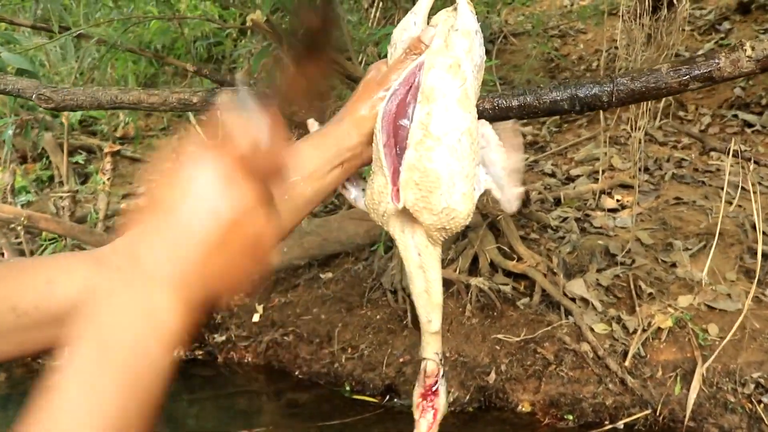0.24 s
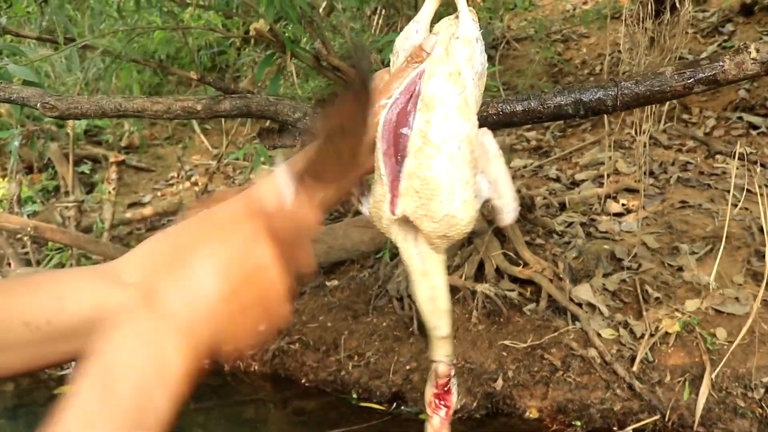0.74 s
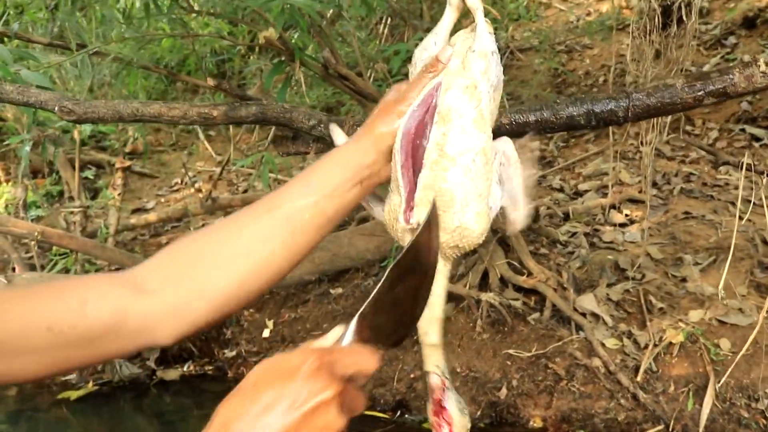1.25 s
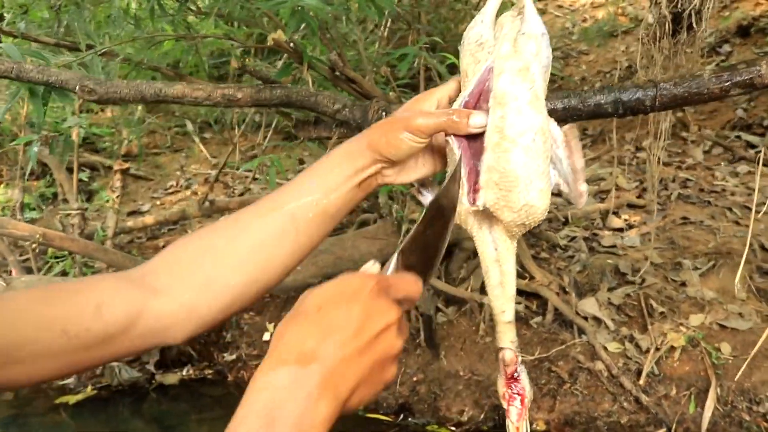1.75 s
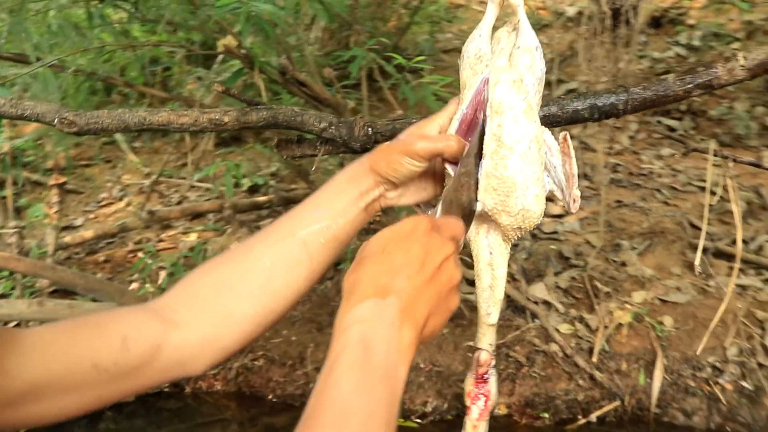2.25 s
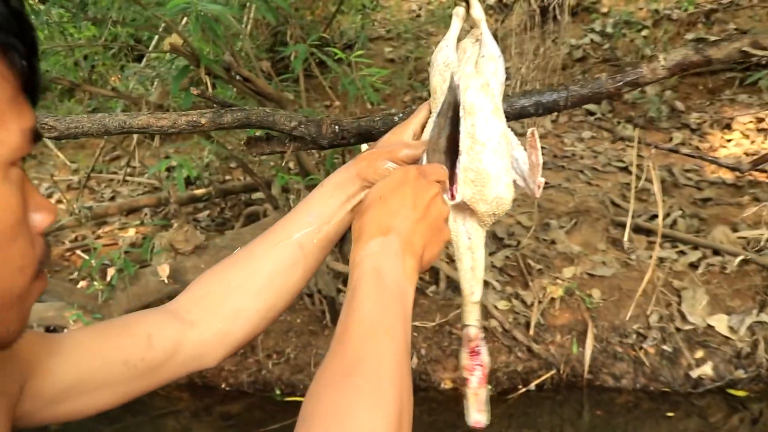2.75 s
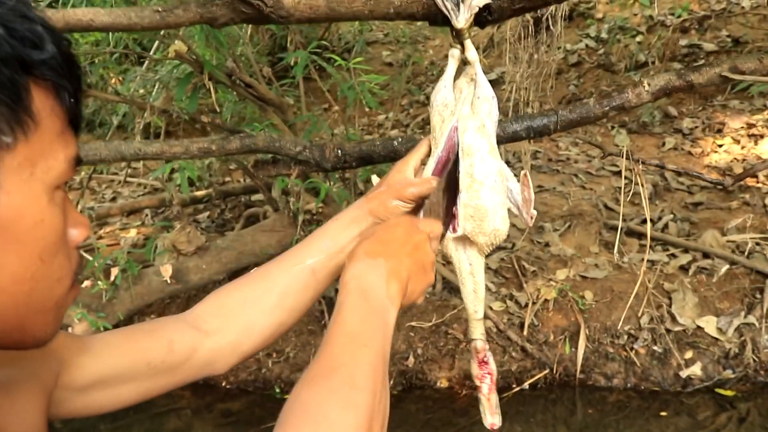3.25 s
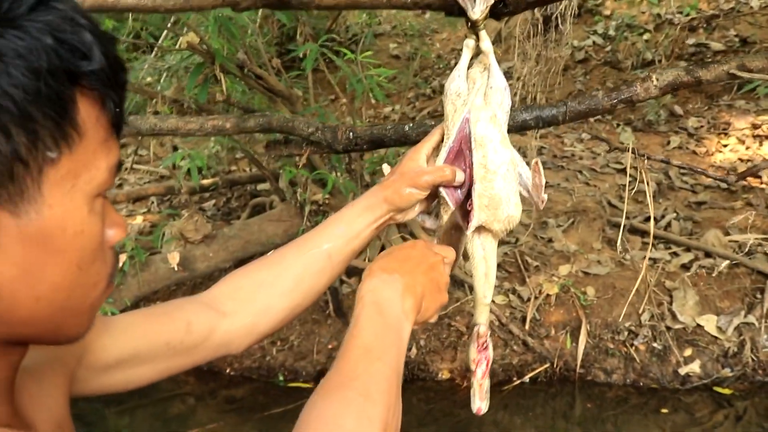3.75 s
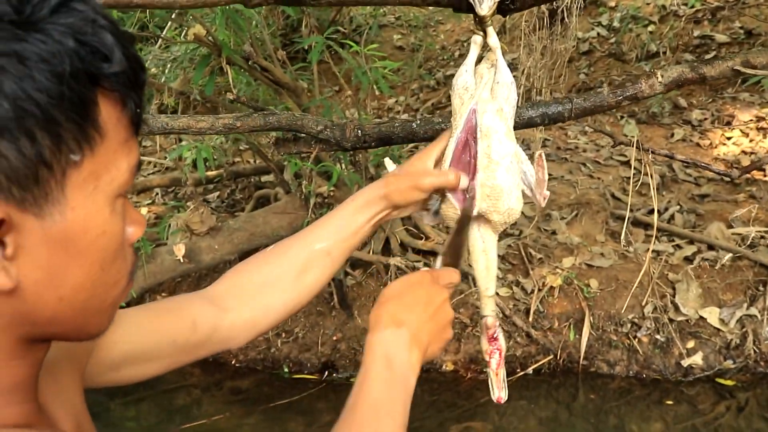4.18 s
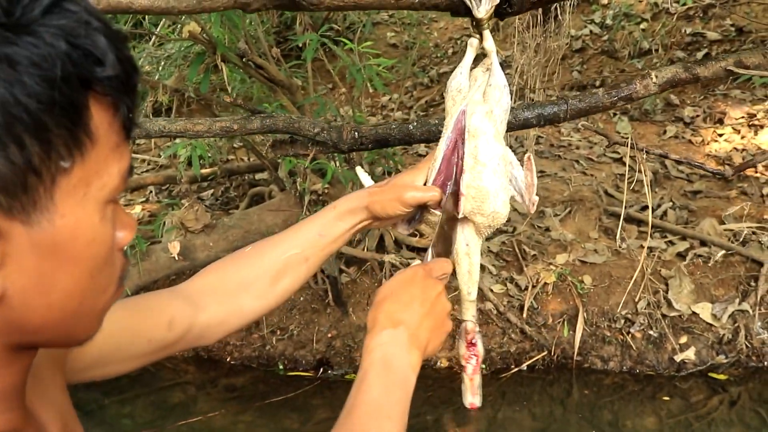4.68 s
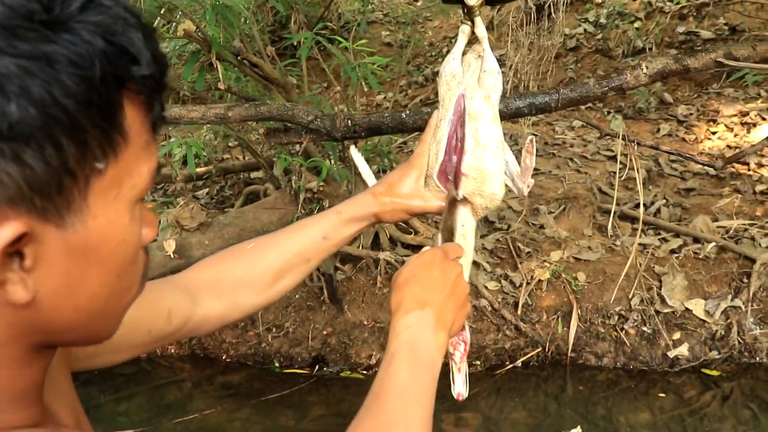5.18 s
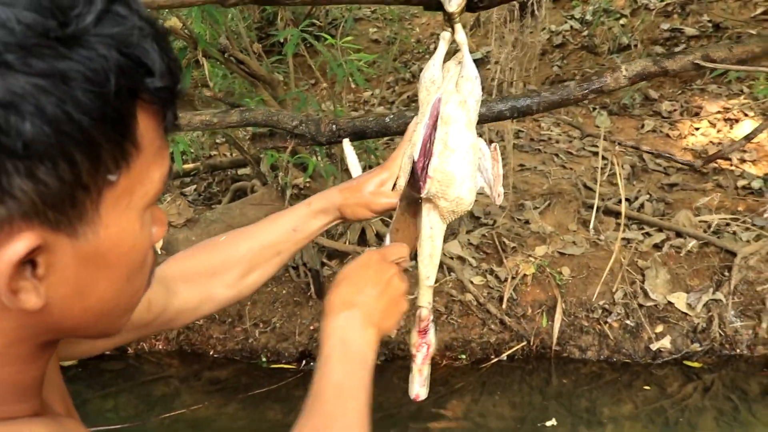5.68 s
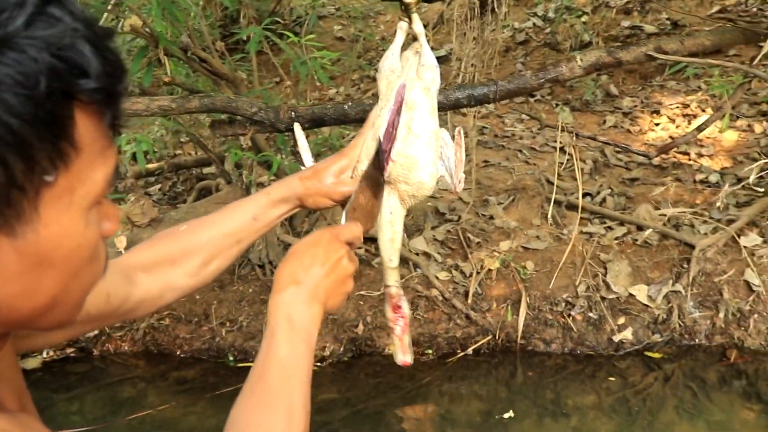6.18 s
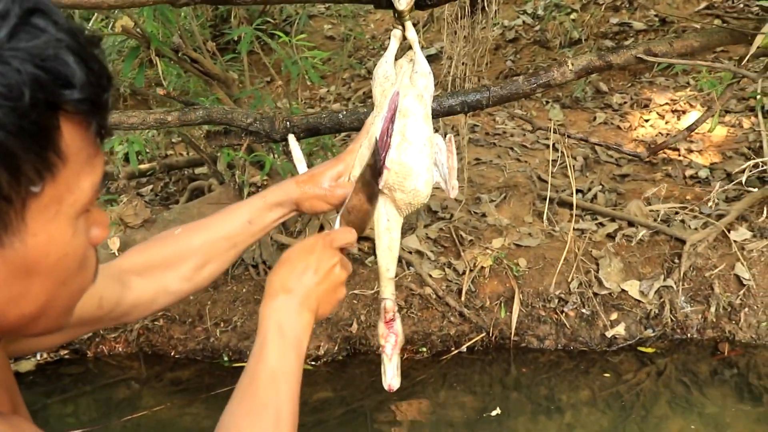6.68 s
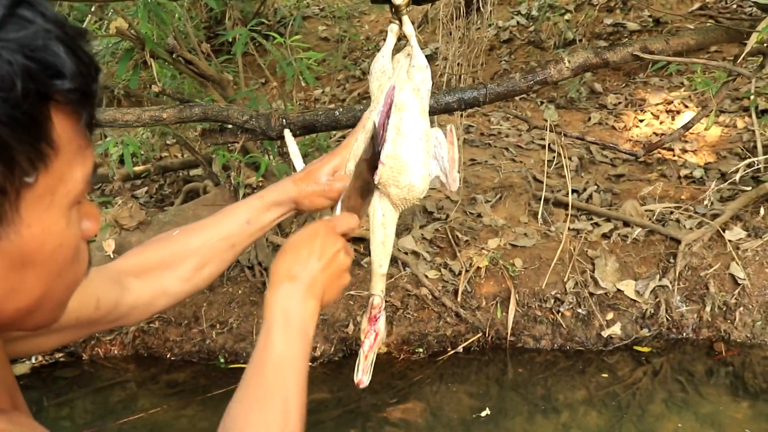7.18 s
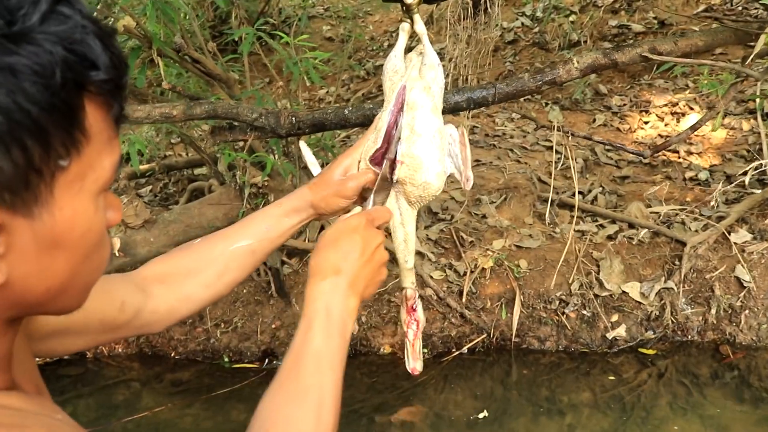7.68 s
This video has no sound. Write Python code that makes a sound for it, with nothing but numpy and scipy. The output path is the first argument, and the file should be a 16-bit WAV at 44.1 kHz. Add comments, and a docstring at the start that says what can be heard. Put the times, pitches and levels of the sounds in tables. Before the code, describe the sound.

A close stereo microphone catches three heavy wet smacks of a blade on a bird carcass within the first second or so. The knife then cuts softly, with tiny ticks and faint steel singing, while drops plip into water. Near the end come about ten fast, gritty scraping strokes with metallic rasp and sharp snaps. All around are a gentle stream, shrill pulsing insects, treble hiss and a faint low throb.

```python
"""Jungle stream, with a plucked bird hanging over it. Filtered noise makes the flickering water, the pulsing
insect trills and a treble hiss; a soft low beat throbs underneath. The flat of a big knife slaps the bird three
times (noise puffs, ringing modes), the edge slices quietly with small snaps, then scrapes feather stubs in quick
strokes (dense clicks drive blade and carcass), and a last cut follows. A few drops plop as gliding bubbles.
A limiter ducks briefly after hard blows."""
import sys
import numpy as np
from scipy import signal
from scipy.fft import rfft, irfft, next_fast_len
from scipy.io import wavfile

SR = 44100
rng = np.random.default_rng(int(sys.argv[2]) if len(sys.argv) > 2 else 0)


def wav_record(signal):
    """Record a signal, one row per channel, as 16-bit PCM in the file named by sys.argv[1]."""
    frames = np.transpose(np.atleast_2d(signal))
    bounded = np.clip(frames, -1, 1)
    # unit amplitude maps onto the largest positive 16-bit level
    quanta = np.round(bounded * 32767).astype(np.int16)
    wavfile.write(sys.argv[1], SR, quanta)


N = 349697
T = np.arange(N) / SR

# modes of the free knife blade: (frequency [Hz], t60 [s], struck flat [dB], rubbed on the edge [dB])
BLADE_MODES = [(2590, 0.057, -10, -39), (2694, 0.043, -28, 4), (2833, 0.038, -36, -1.5),
               (3120, 0.035, 3.5, -7.5), (3160, 0.3, -38, -28), (3360, 0.019, -20, -3.5),
               (3650, 0.022, -23, -7.5), (3940, 0.018, 1, -8), (4240, 0.044, -6, -34),
               (4280, 1.43, -49, -44), (5160, 0.018, 4.5, -46), (6000, 0.06, -23, -23),
               (9140, 0.043, -1, -11), (9890, 0.027, 4.5, -4.5), (9760, 0.23, -25, -9)]


def undb(db):
    """Turn decibels into an amplitude factor."""
    return 10 ** (np.asarray(db) / 20)


def unit(x):
    """Scale to rms 1."""
    return x / np.sqrt(np.mean(x ** 2) + 1e-18)


def fade(t, t60):
    """Exponential decay, 60 dB down at t60."""
    return np.exp(-np.log(1000) * t / t60)


def add(out, s, x):
    """Mix x into out from time s."""
    i = int(s * SR)
    out[..., i:i + x.shape[-1]] += x[..., :N - i]


def lookup(points, hz):
    """Read a curve on a log-frequency axis."""
    f, value = np.transpose(points)
    return np.interp(np.log(hz + 1), np.log(f), value)


def colour(x, points):
    """Filter x by a curve of (frequency [Hz], gain [dB]) points."""
    n = next_fast_len(x.shape[-1])
    gain = undb(lookup(points, np.fft.rfftfreq(n, 1 / SR)))
    return irfft(rfft(x, n) * gain, n)[..., :x.shape[-1]]


def band(x, hz, width):
    """One resonance, gain 1 at its centre."""
    return signal.lfilter(*signal.iirpeak(hz, hz / width, fs=SR), x)


def narrow(hz, width):
    """Band of noise through two equal resonances, unrelated in the two ears."""
    noise = rng.standard_normal((2, N))
    once = band(noise, hz, 1.57 * width)
    return unit(band(once, hz, 1.57 * width))


def walk(rate):
    """Random drift with a spread near 1, joining `rate` random points per second by straight lines."""
    count = int(8 * rate) + 2
    return 1.385 * np.interp(T * rate, np.arange(count), rng.standard_normal(count))


def swell(s, rise_s, fall_s, power):
    """Rise to 1 at time s and fall away again."""
    return np.interp(T, [s - rise_s, s, s + fall_s], [0, 1, 0]) ** power


def ring(t, modes):
    """Sum of struck modes: (frequency [Hz], t60 [s], level [dB])."""
    return sum(undb(db) * fade(t, t60) * np.sin(2 * np.pi * hz * t) for hz, t60, db in modes)


def burst(hz, width, t60):
    """A short puff of noise around one frequency."""
    t = T[:SR // 4]
    return unit(band(rng.standard_normal(len(t)), hz, width)) * fade(t, t60)


def slips(rate, spread_db):
    """Dense clicks of uneven size and random sign, as an edge sticks and slips."""
    hit = rng.random(N) < rate / SR
    size = undb(spread_db * np.minimum(rng.exponential(size=N), 4))
    return hit * rng.choice([-1, 1], N) * size


def rubbed(x, response):
    """A body driven by a stream of tiny slips."""
    return unit(signal.fftconvolve(x, response)[:len(x)])


def thud(t, hz):
    """The carcass wobbles for a few cycles; it is too small to radiate deep bass."""
    # modes of the carcass: (multiple of the thud pitch, t60 [s], relative level [dB])
    flesh_modes = [(1, 0.052, -10.5), (1.25, 0.039, -3.5), (1.9, 0.019, -9)]
    wobble = ring(t, [(hz * multiple, t60, db) for multiple, t60, db in flesh_modes])
    highpass = signal.butter(3, 0.63 * hz, "high", fs=SR, output="sos")
    return signal.sosfilt(highpass, wobble) / 2


def pressed_blade(t, pitch_hz, longest_t60):
    """The blade with its edge in the skin, which damps its modes and shifts them with the point of contact."""
    shift = pitch_hz / BLADE_MODES[1][0]  # the second mode lands on pitch_hz
    return ring(t, [(hz * shift, min(t60, longest_t60), db) for hz, t60, _, db in BLADE_MODES])


def bubble(hz, t60, rise_oct_per_s):
    """A trapped bubble rings and climbs in pitch as it nears the surface."""
    t = T[:SR // 6]
    pitch = hz * 2 ** (rise_oct_per_s * t)
    return fade(t, t60) * np.sin(2 * np.pi * np.cumsum(pitch) / SR)


def stream(water_db=-50, flicker_db=1.5, gurgle_rest_db=-65, gurgle_rise=0.39, bubble_db=-60, count=170):
    """Running water: flickering noise bands, alike in both ears in the bass, a hollow gurgle and small bubbles."""
    # spectrum of the wash: (frequency [Hz], relative density [dB per Hz])
    water_spectrum = [(25, -8), (45, -8.5), (80, -5), (140, -7), (220, -13), (380, -10.5), (600, -15),
                      (850, -15.5), (1400, -12.5), (2200, -17), (4000, -19), (6200, -42.5)]
    # likeness of the two ears: (frequency [Hz], correlation)
    ear_likeness = [(60, 0.81), (300, 0.54), (640, 0.48), (1400, 0.014), (3000, 0)]
    # the stream gurgles up: (time of the peak [s], length [s], level [dB])
    gurgle_swells = [(2.05, 0.76, -62), (4.018, .65, -55), (6.2, 0.6, -59)]
    wash = 0
    for hz in 35 * 2 ** (np.arange(16) / 2):  # half-octave bands
        like = lookup(ear_likeness, hz)
        mid, side = narrow(hz, hz / 3)
        pair = np.sqrt(1 + like) * mid + np.sqrt(1 - like) * side * np.array([[1], [-1]])
        wash = wash + pair * np.sqrt(hz) * undb(lookup(water_spectrum, hz) + flicker_db * walk(14))

    hollow = narrow(341, 106)
    hollow = unit(hollow + hollow.mean(axis=0))  # drawn towards the middle
    gurgle = undb(gurgle_rest_db)
    for s, length, db in gurgle_swells:
        # gurgle_rise is the share of a swell in which it builds
        gurgle = gurgle + undb(db) * swell(s, gurgle_rise * length, (1 - gurgle_rise) * length, 0.78)

    out = unit(wash) * undb(water_db) + hollow * gurgle
    for when, size, loud, side in rng.random((count, 4)):
        pan = np.sqrt([[side], [1 - side]])
        level = undb(bubble_db + 14 * loud ** 2)
        add(out, when * N / SR, pan * level * bubble(450 * 6 ** size, 0.021, 4.6))
    return out


def insects(waver_db=0.7):
    """Wingbeats pulse bands of noise into a chorus of trills; crickets chirp in narrow bands among them."""
    # chorus: (centre [Hz], width [Hz], level [dB], mean pulse rate [per s], pulse depth [0-1])
    chorus_bands = [(6786, 67, -56.5, 66, 0.25), (7150, 240, -54.5, 84, 0.17), (7463, 120, -54.5, 35, 0),
                    (7506, 140, -53, 120, 0.45), (7450, 570, -53, 260, 0.3)]
    # chirping crickets: (centre [Hz], level [dB], mean chirp rate [per s])
    cricket_bands = [(8050, -61.5, 5.1), (8260, -72, 6.5), (7260, -66, 7.3)]
    out = 0
    for hz, width, db, rate, depth in chorus_bands:
        wings = np.cumsum(rate * (1 + 0.0205 * walk(4))) / SR  # cycles, at a wavering rate
        pulses = unit(1 + depth * np.cos(2 * np.pi * wings))
        out = out + narrow(hz, width) * pulses * undb(db + waver_db * walk(5.4))
    for hz, db, rate in cricket_bands:
        chirps = np.cumsum(rate * (1 + 0.13 * walk(2.88))) / SR
        pulses = unit(np.sin(np.pi * chirps) ** 4 + 0.071)
        out = out + narrow(hz, 70) * pulses * undb(db)
    return out


def treble_hiss():
    """Treble noise, unrelated in the two ears, whose level slowly drifts."""
    # spectrum: (frequency [Hz], relative density [dB per Hz])
    hiss_spectrum = [(4000, -3.5), (6000, -2.5), (8500, -0.5), (10500, -1), (13000, -5), (16000, -6)]
    # loudness over time: (time [s], level [dB])
    hiss_level = [(0, -48), (1.6, -49), (2.0, -54), (2.45, -53.5), (2.7, -56.5), (3.4, -50.5), (4.1, -56.5),
                  (5.6, -56), (7.93, -49.5)]
    noise = unit(colour(rng.standard_normal((2, N)), hiss_spectrum))
    return noise * undb(np.interp(T, *np.transpose(hiss_level)))


def slaps(crack_t60=0.021, smack_t60=0.018, spray_db=-40, spray_t60=0.45,
          turn_rate_hz=5.0, turn_depth=0.29, lift_s=0.022):
    """The flat of the blade squeezes air and water off the skin; flesh thuds, steel clangs and one mode rings on."""
    # slaps: (time [s], thud [dB], thud pitch [Hz], smack [dB], smack centre [Hz], smack width [Hz],
    # wet crack [dB], crack centre [Hz], crack width [Hz] (both ahead of a broad filter),
    # clang [dB], long ring [dB], time until the hand damps it [s])
    blade_slaps = [(0.017, -2, 241, -9, 1120, 2570, -15, 9300, 7900, -31, -47, 0.0044),
                   (0.5523, -7, 236, -4, 1210, 2500, 8, 8200, 10300, -3.5, -41, 0.58),
                   (1.1182, -13.5, 222, -13.5, 470, 71, -6, 6400, 2270, -32, -42.5, 0.1)]
    out, t = np.zeros(N), T[:SR]
    clang = ring(t, [(hz, t60, db) for hz, t60, db, _ in BLADE_MODES])
    free_hz, free_t60, *_ = max(BLADE_MODES, key=lambda mode: mode[1])
    # the ring opens as the blade lifts off the skin, then swells and sinks as the swinging blade turns its face
    lift = 1 - np.exp(-t / lift_s)
    turn = 1 - turn_depth * np.cos(2 * np.pi * turn_rate_hz * t)
    sing = ring(t, [(free_hz, free_t60, 0)]) * lift * turn
    for (s, thud_db, thud_hz, smack_db, smack_hz, smack_width,
         crack_db, crack_hz, crack_width, clang_db, ring_db, free_s) in blade_slaps:
        damping = 1 / (1 + (t / free_s) ** 5)
        steel = (undb(clang_db) * clang + undb(ring_db) * sing) * damping
        smack = band(burst(smack_hz, smack_width, smack_t60), smack_hz, 2 * smack_hz + smack_width)
        crack = band(burst(crack_hz, crack_width, crack_t60), 7400, 14700)
        add(out, s, undb(thud_db) * thud(t, thud_hz) + steel)
        add(out, s, undb(smack_db) * smack)
        add(out, s, undb(crack_db) * crack)
        add(out, s, undb(crack_db + spray_db) * burst(7000, 5000, spray_t60))
    return out


def throb(db=-43, range_db=15, rate_hz=8.58):
    """A soft low beat: a short decaying bass tone, repeated evenly at uneven strength."""
    out, beat = np.zeros(N), ring(T[:SR // 5], [(58.7, 0.18, 0.0044)])
    for s in np.arange(.072, N / SR, 1 / rate_hz):
        add(out, s, undb(db - range_db * rng.random()) * beat)
    return out


def snaps(snap_t60=0.011, spread=0.5, flesh_hz=260, flesh_db=8,
          tick_from_s=4.4, tick_to_s=6.2, tick_db=-39.5, tick_range_db=8, tick_hz=9700, count=8):
    """A stub or sinew lets go of the edge and jolts blade and carcass; fine fibres only tick, at random."""
    # the edge catches and snaps: (time [s], snap [dB], snap centre [Hz], tug on blade and carcass [dB])
    edge_snaps = [(1.367, -33, 11200, -53), (1.635, -37, 9000, -51), (2.317, -40, 3000, -50),
                  (3.055, -36, 5700, -53), (5.7438, -32.5, 11200, -50), (5.948, -26.5, 9700, -37),
                  (6.197, -28, 3760, -41), (6.4485, -31, 7400, -33), (6.557, -29, 3960, -36.5),
                  (6.6814, -21.5, 9100, -34), (6.7116, -26.5, 9000, -34), (6.9474, -34, 9000, -36),
                  (7.0407, -42, 9000, -41.5), (7.1632, -28, 10150, -48), (7.2137, -27, 9000, -32.5),
                  (7.4477, -30, 8000, -36), (7.48, -26.5, 7800, -39)]
    out, t = np.zeros(N), T[:SR // 4]
    # flesh_db sets the carcass relative to the blade's tug
    jolt = pressed_blade(t, pitch_hz=2854, longest_t60=0.02) + undb(flesh_db) * thud(t, flesh_hz)

    def tick(hz):
        """Parting fibre: a tiny puff of noise."""
        return band(burst(hz, spread * hz, snap_t60), hz, 2 * spread * hz)

    for s, db, hz, tug_db in edge_snaps:
        add(out, s, undb(db) * tick(hz) + undb(tug_db) * jolt)
    for when, weak in rng.random((count, 2)):
        s = tick_from_s + when * (tick_to_s - tick_from_s)
        add(out, s, undb(tick_db - tick_range_db * weak) * tick(tick_hz))
    return out


def drops(rise_oct_per_s=3.3, splash_hz=3940, splash_t60=0.014, droplet_t60=0.024, count=6,
          spatter_s=.24, spatter_db=-7.5, spatter_low_hz=1010, spatter_high_hz=2620):
    """A drop splashes, traps a bubble and throws up droplets that plink as they fall back."""
    # drops into the stream: (time [s], starting pitch [Hz], bubble [dB], t60 [s], splash [dB])
    stream_drops = [(1.579, 654, -33, .035, -43.5), (3.078, 2240, -39.5, .034, -56),
                    (3.1251, 850, -33.5, 0.14, -33.5), (3.18, 1130, -47, 0.19, -50)]
    out = np.zeros(N)
    for s, hz, db, t60, splash_db in stream_drops:
        splash = band(burst(splash_hz, splash_hz / 2, splash_t60), splash_hz, splash_hz)
        add(out, s, undb(splash_db) * splash)
        add(out, s, undb(db) * bubble(hz, t60, rise_oct_per_s))
        for flight, pitch in rng.random((count, 2)):
            hz = spatter_low_hz + pitch * (spatter_high_hz - spatter_low_hz)
            plink = bubble(hz, droplet_t60, rise_oct_per_s)
            # spatter_db is relative to the splash
            add(out, s + flight * spatter_s, undb(splash_db + spatter_db) * plink)
    return out


def cutting(power=0.95, ring_power=1.05, rise_share=.35, linger=3.5):
    """Skin parts with a fine crackle of slips; the blade sings faintly around its freest mode and outlasts it."""
    # slow cuts through skin: (time of the peak [s], length [s], hiss [dB], blade ring [dB])
    skin_cuts = [(2.367, 0.18, -68, -63), (3.055, .08, -54, -68), (3.426, 0.41, -54, -66),
                 (3.814, 0.2, -52.5, -79), (4.65, 0.069, -51.5, -73), (4.816, 0.11, -53, -58),
                 (7.88, 0.043, -46, -67)]
    # spectrum of parting skin: (frequency [Hz], relative density [dB per Hz])
    slice_spectrum = [(2000, -8), (4900, -1), (5750, 8.5), (6500, 4), (9000, 7), (11200, 8), (13000, 0),
                      (16000, -52)]
    force = slips(rate=2700, spread_db=1.5)
    hiss = unit(colour(force, slice_spectrum))
    sing = unit(band(band(force, 4290, 260), 4290, 260))
    out = 0
    for s, length, hiss_db, ring_db in skin_cuts:
        rise, fall = rise_share * length, (1 - rise_share) * length
        out = out + undb(hiss_db) * hiss * swell(s, rise, fall, power)
        out = out + undb(ring_db) * sing * swell(s, rise, linger * fall, ring_power)
    return out


def scraping(power=1.2, rise_share=0.45, judder_db=3.0, drag_db=-55, flesh_hz=235, flesh_db=-5.5,
             ring_hz=2760, ring_sag_hz_per_s=82, wander=0.0097,
             zing_db=-3, zing_fade_db_per_s=17.5, uneven_db=3):
    """The edge judders over feather stubs: slips rasp, ring the blade and shake flesh; it drags between strokes."""
    # scraping strokes: (time of the peak [s], length [s], rasp [dB], blade ring relative to the rasp [dB])
    scrape_strokes = [(6.326, 0.09, -38.5, -2), (6.447, 0.067, -45.5, 5), (6.575, 0.13, -39.5, 4.5),
                      (6.693, 0.097, -39, 4.5), (6.827, 0.087, -40, 3), (6.96, 0.043, -38.5, 0.5),
                      (7.086, .11, -35, 3), (7.196, 0.085, -35, 0.5), (7.33, 0.12, -39.5, 4),
                      (7.46, 0.065, -39.5, 1)]
    # spectrum of the rasp: (frequency [Hz], relative density [dB per Hz])
    rasp_spectrum = [(150, -39), (500, 10.5), (800, -10.5), (1300, -2), (2200, -17), (3500, 12.5),
                     (4900, 0), (6000, 5.5), (7400, -1.5), (8200, 2.5), (9600, 5.5), (12000, 5.5),
                     (15500, -9)]
    t = T[:SR // 10]
    force = slips(rate=5200, spread_db=2.5) * undb(judder_db * walk(170))
    rasp = unit(colour(force, rasp_spectrum))
    flesh = rubbed(force, thud(t, flesh_hz))
    zing = unit(band(band(force, 4240, 380), 4210, 380))
    first, last = scrape_strokes[0][0], scrape_strokes[-1][0]
    out = undb(drag_db) * rasp * np.interp(T, [first - .1, first, last, last + 0.11], [0, 1, 1, 0])
    chances = rng.standard_normal((len(scrape_strokes), 2))
    for (s, length, db, ring_db), (contact, angle) in zip(scrape_strokes, chances):
        # the contact moves along the edge stroke by stroke: the ring sinks and the bright zing fades
        pitch = (ring_hz - ring_sag_hz_per_s * (s - first)) * (1 + wander * contact)
        steel = rubbed(force, pressed_blade(t, pitch, longest_t60=0.033))
        zing_level = undb(zing_db - zing_fade_db_per_s * (s - first) + uneven_db * angle)
        stroke = rasp + undb(ring_db) * steel + zing_level * zing + undb(flesh_db) * flesh
        pressure = swell(s, rise_share * length, (1 - rise_share) * length, power)
        out = out + undb(db) * pressure * stroke
    return out


def near(x, pan_db=-2.4, lag_s=.000013, scatter_db=-11, scatter_t60=0.018, bank_db=-35, bank_t60=0.19):
    """Close by and a little right; arms and branches scatter the sound, the bank returns a faint tail."""
    scatter = burst(4100, 10000, scatter_t60) * (T[:SR // 4] > .001)
    side = signal.fftconvolve(x, scatter / np.linalg.norm(scatter))[:N] * undb(scatter_db)

    t = T[:SR // 3]
    tail = rng.standard_normal((2, len(t))) * fade(t, bank_t60) * (t > .008)
    bank = signal.fftconvolve(x[None], tail / np.linalg.norm(tail[0]), axes=1)[:, :N]

    # the left ear is further away: delay it by a fraction of a sample
    n = next_fast_len(N)
    delay = np.exp(-2j * np.pi * np.fft.rfftfreq(n, 1 / SR) * lag_s)
    late = irfft(rfft(x, n) * delay, n)[:N]
    pan = undb(np.array([[pan_db], [-pan_db]]) / 2)
    return np.array([late + side, x - side]) * pan + undb(bank_db) * bank


def scene():
    """Knife work and drops in front, water and insects all round."""
    around = stream() + insects() + treble_hiss() + throb()
    close = near(slaps() + snaps() + drops() + cutting() + scraping())
    return around + close


def record(dry, ceiling=0.31, attack_s=0.0019, release_s=0.067, top_hz=16000):
    """A limiter ducks after hard blows, whose first instant may clip before it reacts; the top is cut."""
    pole = np.exp(-1 / (attack_s * SR))
    loudness = signal.lfilter([1 - pole], [1, -pole], np.abs(dry).max(axis=0))
    over = np.maximum(np.log(loudness / ceiling + 1e-9), 0)
    # each overshoot is held and decays exponentially
    recover = np.exp(-T / release_s)
    duck = np.maximum.accumulate(over / recover) * recover
    clipped = np.clip(dry * np.exp(-duck), -.9, .9)
    lowpass = signal.ellip(10, .2, 80, top_hz, fs=SR, output="sos")
    return signal.sosfilt(lowpass, clipped)


dry = scene()
out = record(dry)
wav_record(out)
```